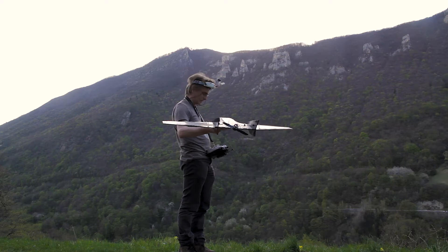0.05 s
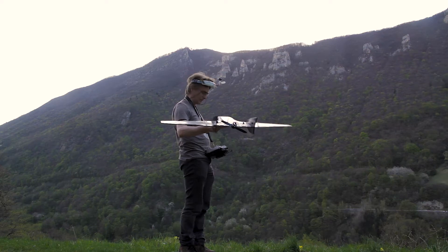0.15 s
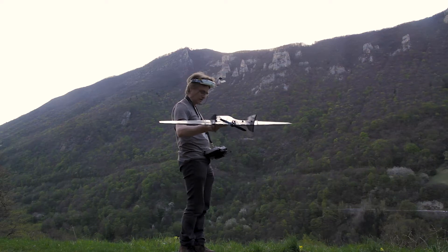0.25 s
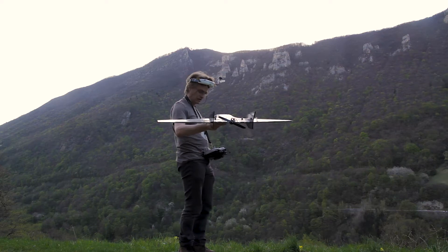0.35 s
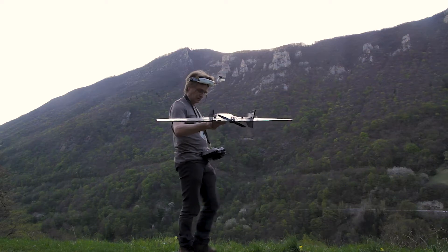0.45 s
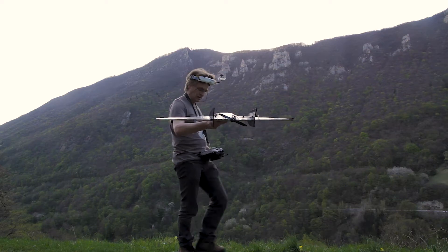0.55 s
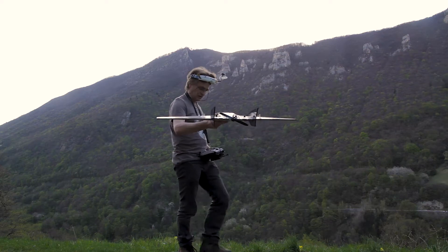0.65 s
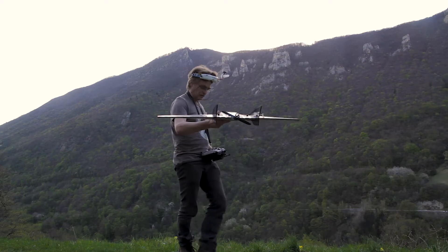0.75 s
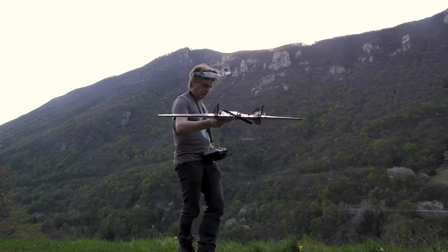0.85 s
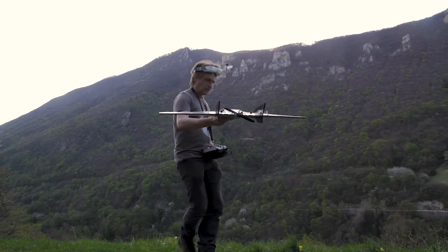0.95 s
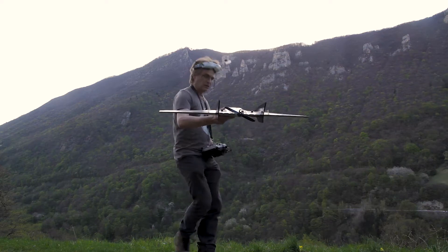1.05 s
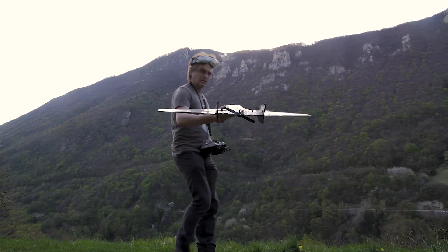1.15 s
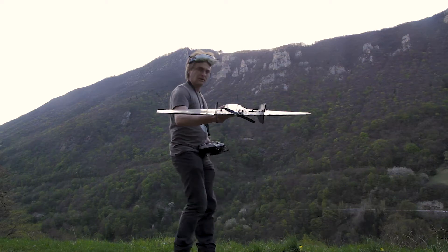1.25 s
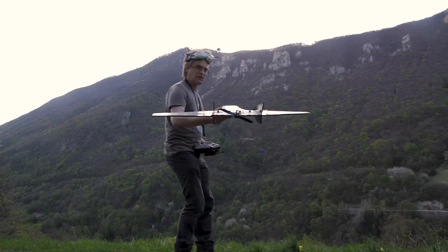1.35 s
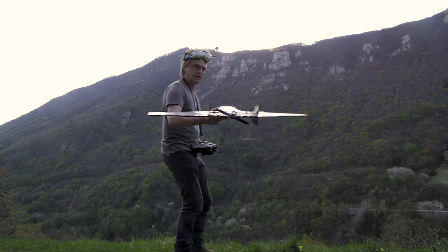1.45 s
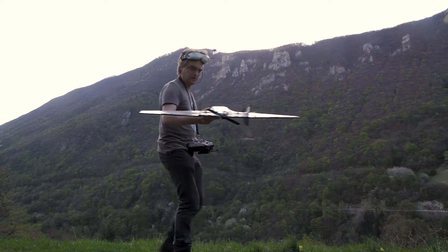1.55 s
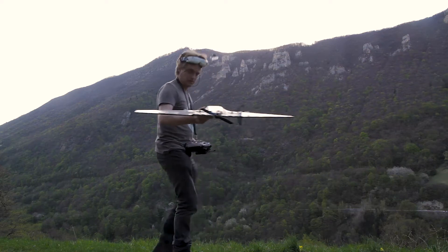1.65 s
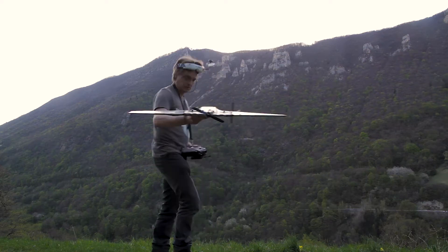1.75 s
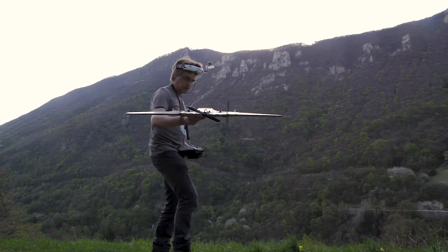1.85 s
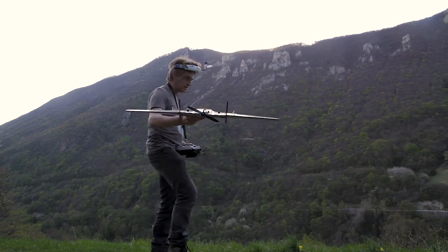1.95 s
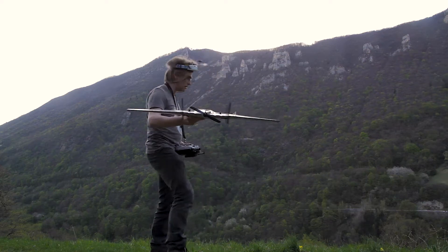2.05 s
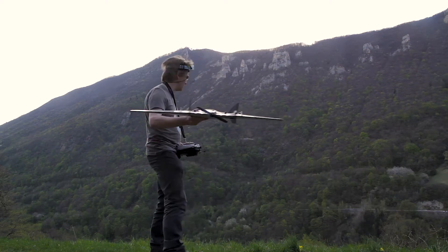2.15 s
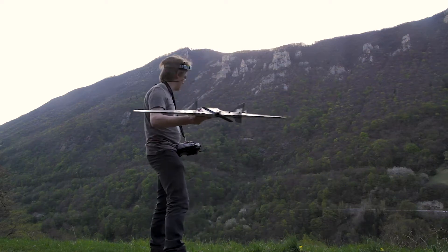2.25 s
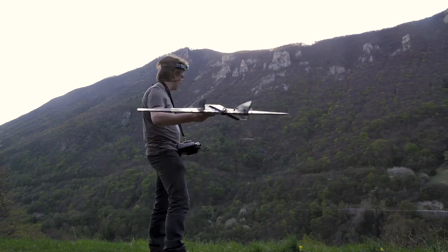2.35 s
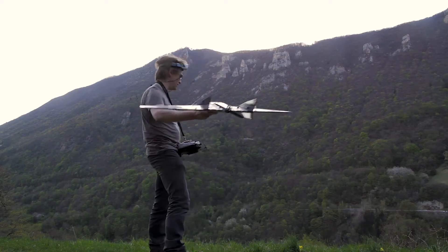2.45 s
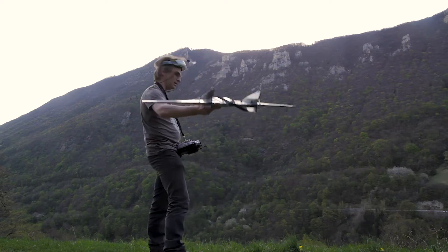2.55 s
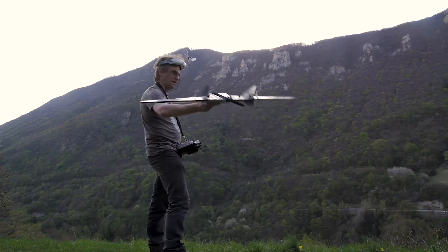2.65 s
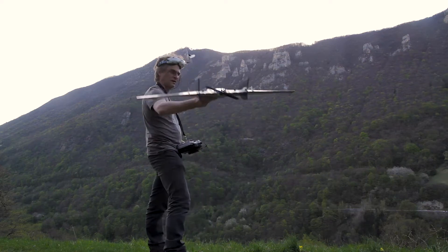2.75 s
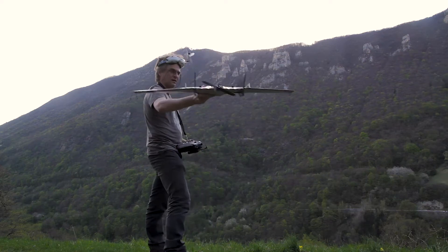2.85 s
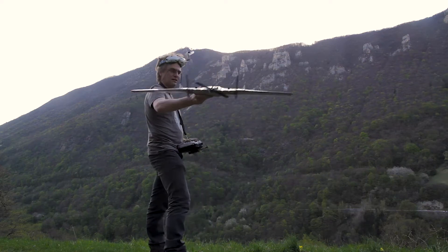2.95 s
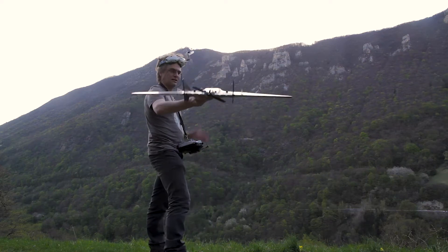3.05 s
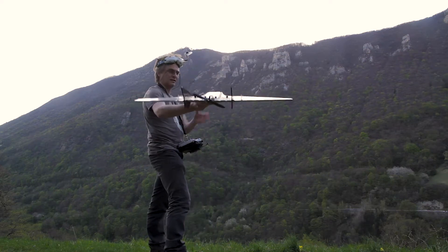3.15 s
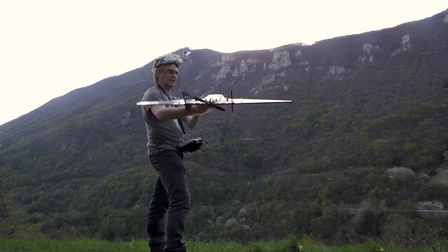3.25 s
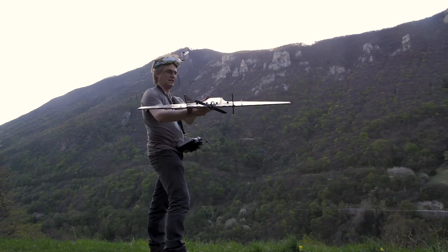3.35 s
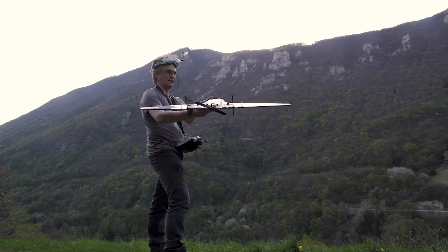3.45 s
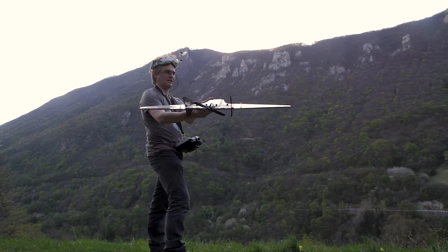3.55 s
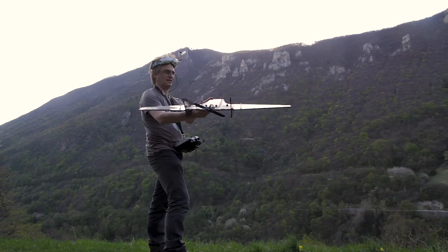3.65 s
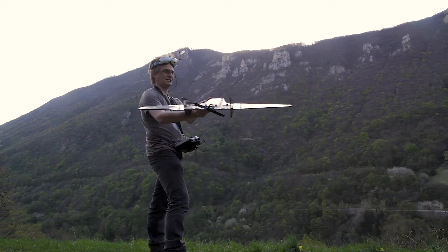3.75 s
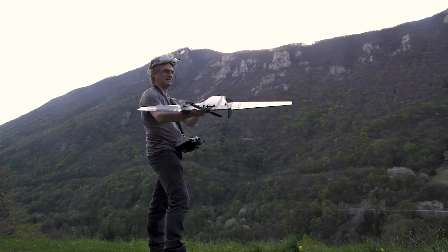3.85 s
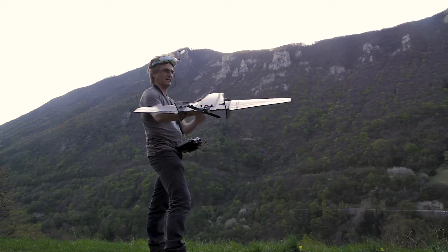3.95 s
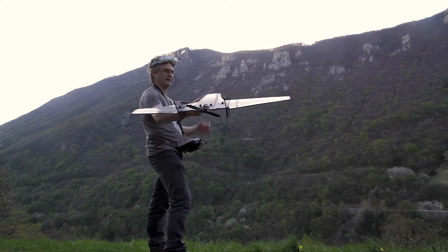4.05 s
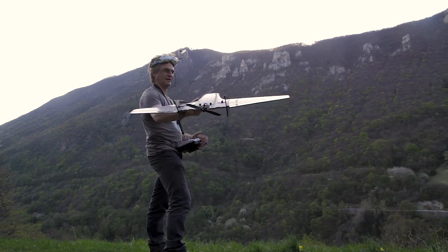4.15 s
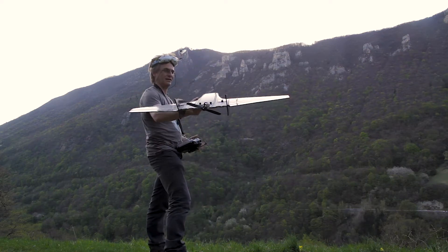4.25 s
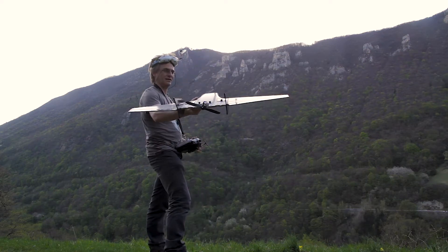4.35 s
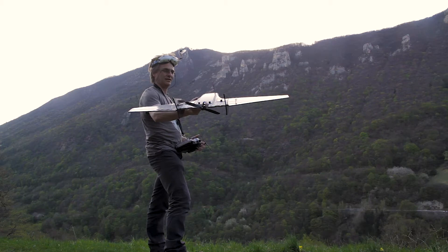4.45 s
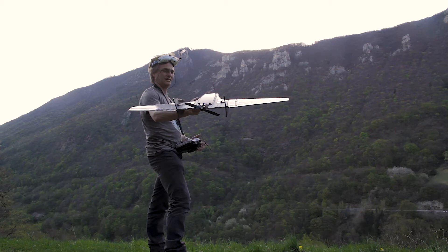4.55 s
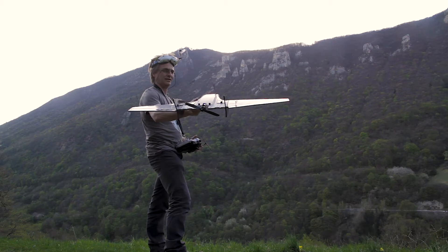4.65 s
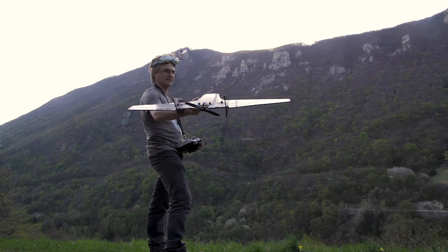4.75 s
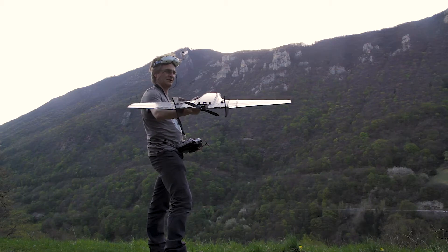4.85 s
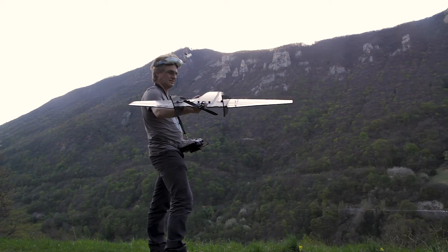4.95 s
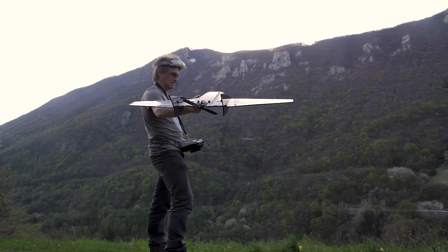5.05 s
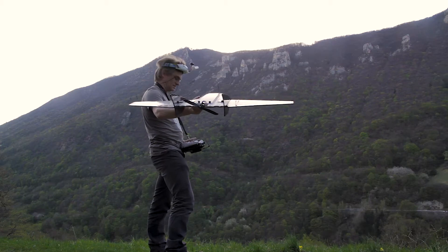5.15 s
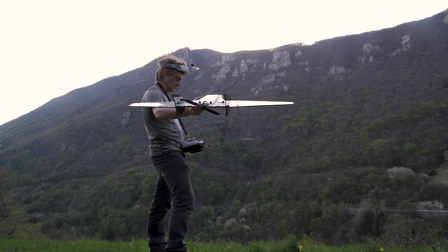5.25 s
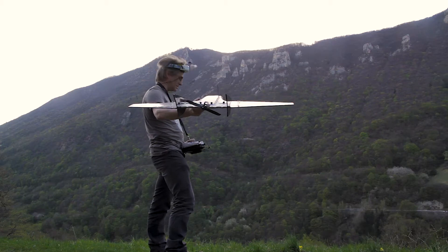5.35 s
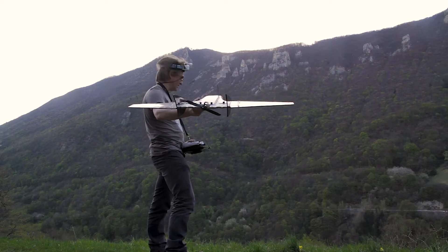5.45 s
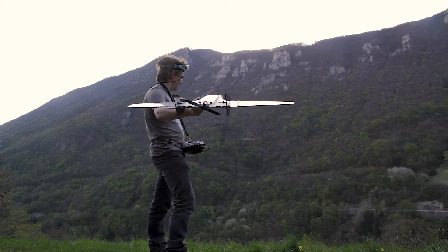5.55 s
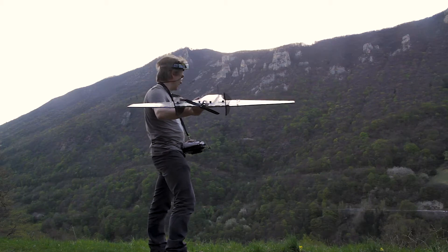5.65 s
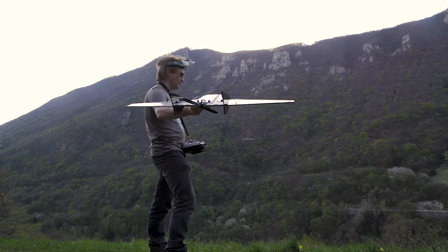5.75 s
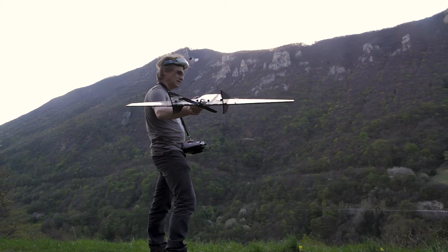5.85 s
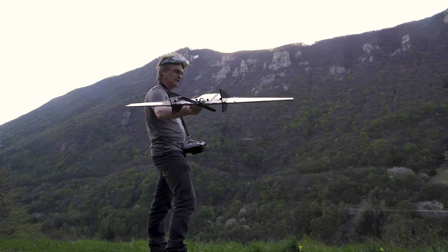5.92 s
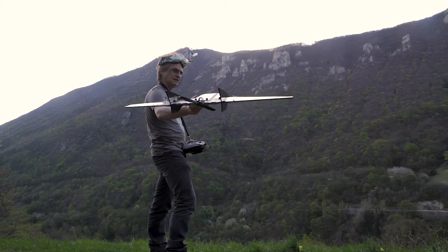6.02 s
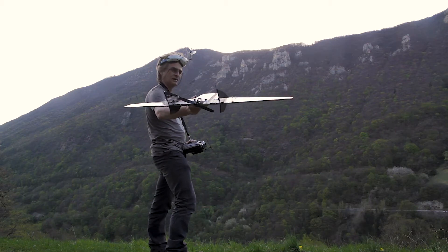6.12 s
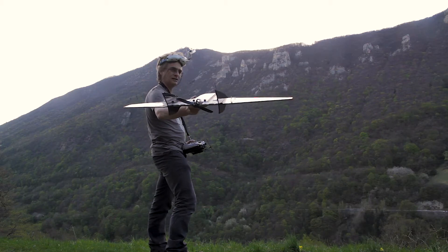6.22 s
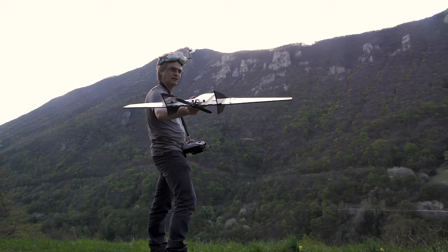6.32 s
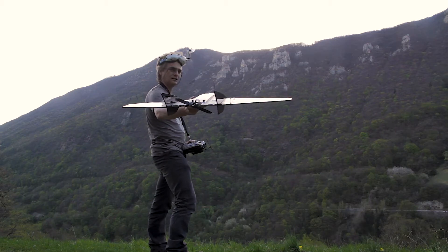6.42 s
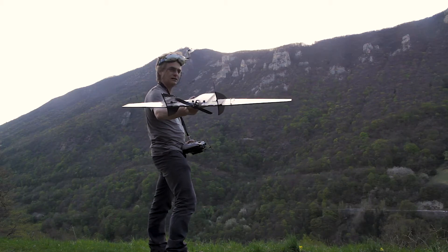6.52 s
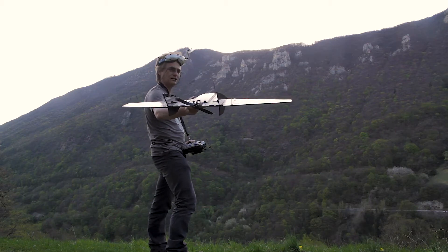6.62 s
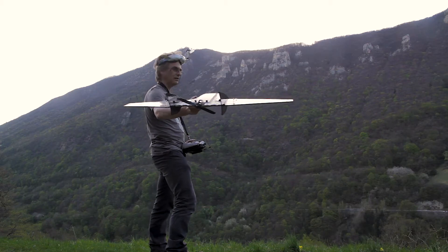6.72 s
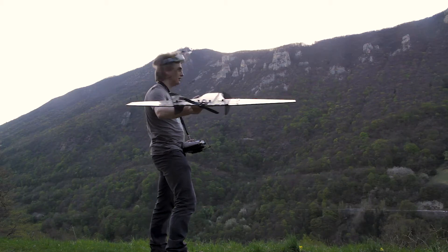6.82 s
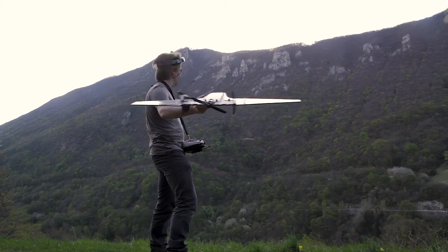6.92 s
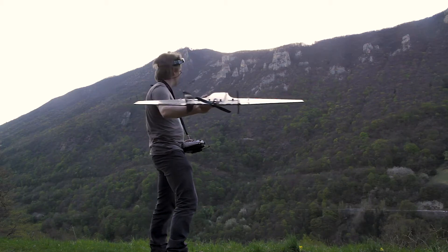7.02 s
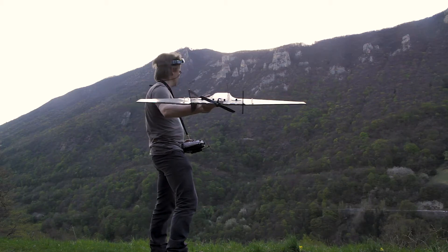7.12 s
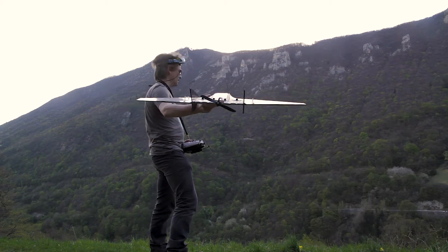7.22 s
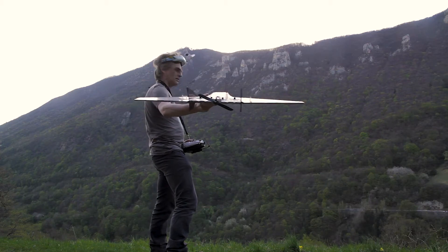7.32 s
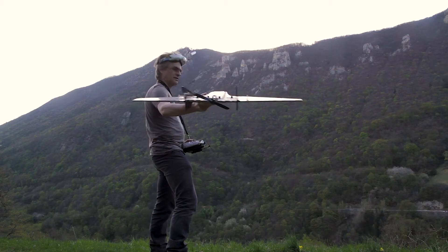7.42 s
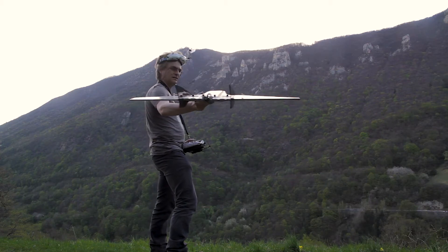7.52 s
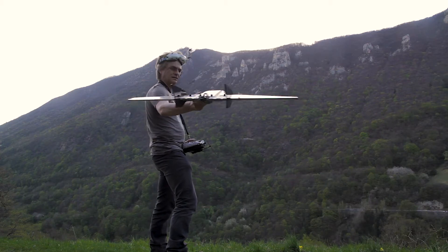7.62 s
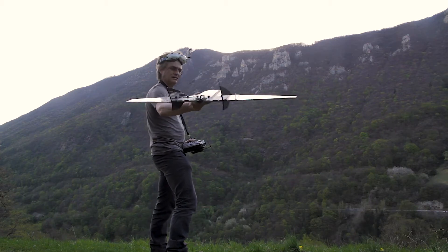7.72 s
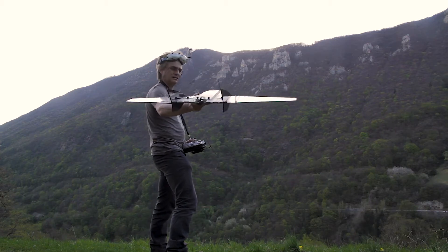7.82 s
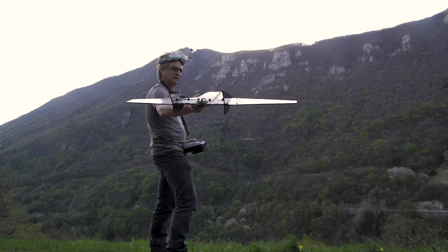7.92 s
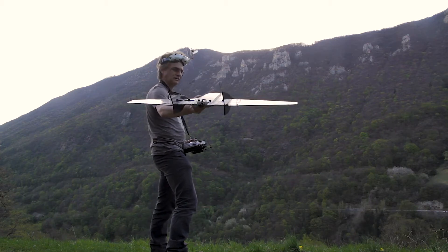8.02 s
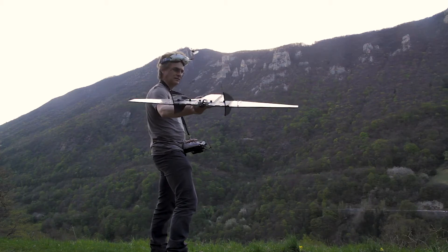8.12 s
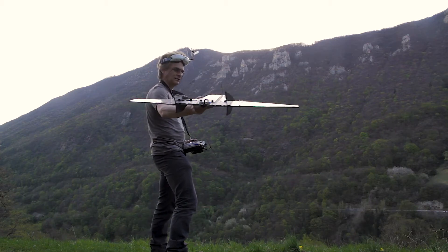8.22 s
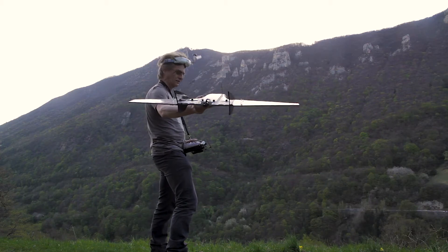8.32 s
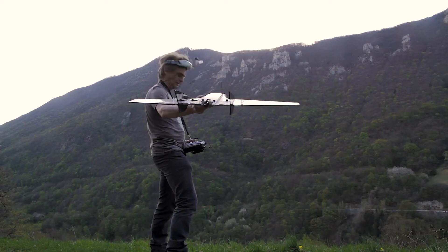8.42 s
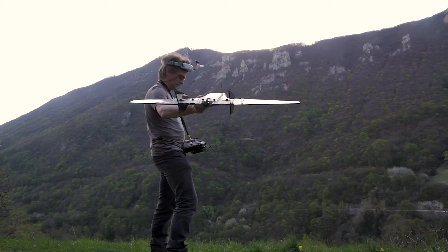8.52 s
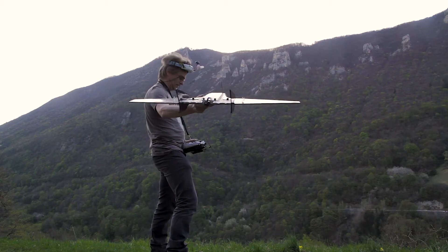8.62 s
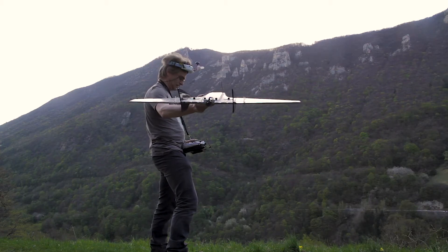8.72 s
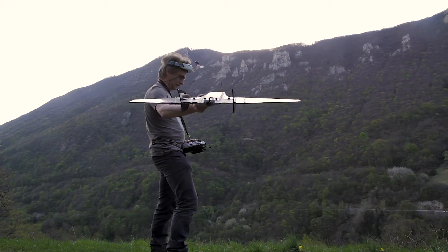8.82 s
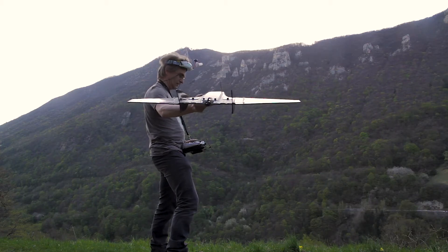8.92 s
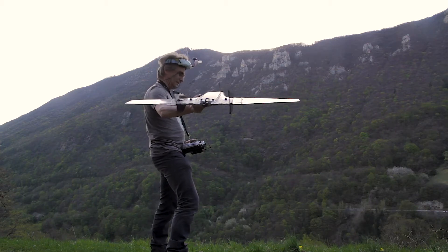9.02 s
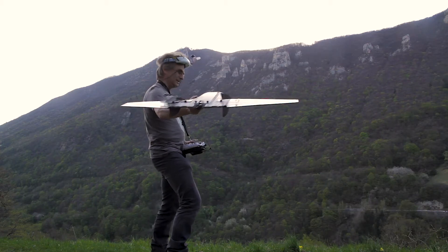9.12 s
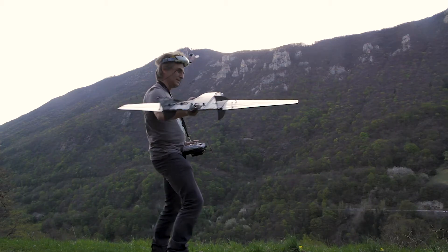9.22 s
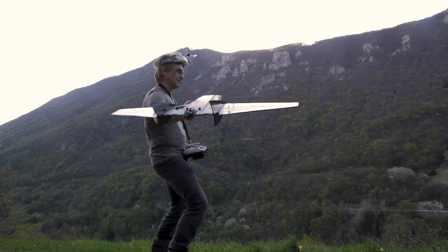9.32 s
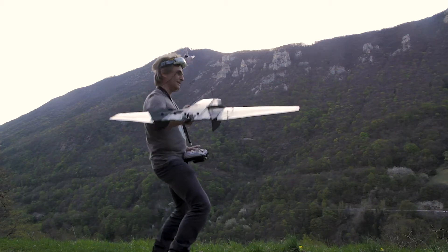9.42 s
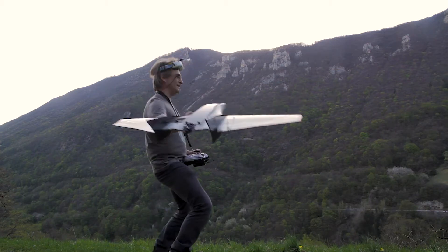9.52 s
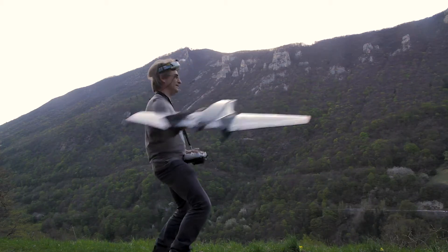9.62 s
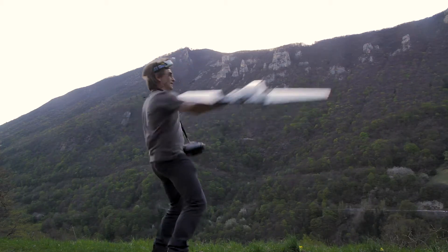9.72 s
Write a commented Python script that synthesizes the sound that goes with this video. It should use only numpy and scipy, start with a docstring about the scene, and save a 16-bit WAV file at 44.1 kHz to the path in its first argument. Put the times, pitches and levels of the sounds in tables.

```python
"""A grassy slope above a quiet valley: far rumble and wash, near and far birds, feet shuffling and
snapping dry stalks close by. A far engine's drone joins in midway, and one bird repeats its song.
Then a hand-held model plane is switched on: its electric motor jolts at each commutation step, ticks
and whines up, and a two-blade propeller sings at multiples of its blade rate over throbbing air rush.
At full speed it is loud enough to flatten the peaks in a mono camera microphone."""
import sys
import numpy as np
from scipy import signal
from scipy.fft import rfft, irfft, next_fast_len
from scipy.io import wavfile
from scipy.ndimage import uniform_filter1d

SR = 44100
rng = np.random.default_rng(int(sys.argv[2]) if len(sys.argv) > 2 else 0)


def attenuation_scalar(level_db):
    """Turn a level in dB into a linear amplitude multiplier (20 dB per decade)."""
    decades = np.asarray(level_db, float) / 20
    return 10 ** decades


def store_pcm(level_fs):
    """Save levels as 16-bit WAV."""
    pcm = np.round(np.clip(level_fs, -1, 1) * 32767).astype(np.int16)
    wavfile.write(sys.argv[1], SR, np.atleast_2d(pcm).T)


N = 430857
T = np.arange(N) / SR


def level(x, db):
    """Scale to an rms level."""
    return x * attenuation_scalar(db) / np.sqrt(np.mean(x ** 2))


def columns(table, t=T):
    """Curves of a table over time, joined by straight lines."""
    s, *cols = np.transpose(table)
    return [np.interp(t, s, c) for c in cols]


def colour(x, points):
    """Shape by a (Hz, dB) spectrum, straight over log frequency."""
    hz, db = np.transpose(points)
    size = next_fast_len(len(x))
    f = np.arange(1, size // 2 + 2) * SR / size
    gain = attenuation_scalar(np.interp(np.log(f), np.log(hz), db))
    return irfft(rfft(x, size) * gain, size)[:len(x)]


def walk(rate, count=N):
    """Random levels held 1 / rate s and slewed twice; spread near 1."""
    hold = int(SR / rate)
    steps = np.repeat(rng.standard_normal(count // hold + 1), hold)
    return 1.56 * uniform_filter1d(uniform_filter1d(steps, hold), hold)[:count]


def band(x, hz, width_hz):
    """One resonance, gain 1 at the centre."""
    return signal.lfilter(*signal.iirpeak(hz, hz / width_hz, fs=SR), x)


# spectrum of the far wash: freq_hz, level_db (per Hz, relative)
WASH_COLOUR = [(20, -8), (70, -0.5), (250, -4), (500, -12), (1000, -16), (2000, -18.5), (3200, -28),
               (4200, -37), (4800, -45), (6300, -52), (16000, -59)]
WASH_DB = -42.5
# far engine and air: start_s, rumble_db
RUMBLE_LEVEL = [(0.0, -66), (1.52, -42.5), (3.26, -51.5), (4.87, -37), (7.5, -38)]
# spectrum of that rumble: freq_hz, level_db (per Hz, relative)
RUMBLE_COLOUR = [(15, -16), (30, 4.5), (70, 7), (120, 2), (170, -8), (400, -62)]
# far engine's drone, around which it wanders: start_s, pitch_hz, peak_db
DRONE = [(4.4, 100.1, -69), (4.9, 112, -40.5), (5.3, 122, -36), (5.9, 112, -43), (6.5, 118, -40),
         (7.1, 117.7, -46.5), (7.8, 121.3, -38), (8.2, 120, -61)]
# rustle of leaves: start_s, level_db
LEAVES = [(0, -77), (1.3, -72.5), (2.3, -73), (2.8, -94), (7.5, -98)]


def valley():
    """Far air and engine: shaped noises that billow, and a sine drone that drifts in pitch and level."""
    wash = level(colour(rng.standard_normal(N), WASH_COLOUR), WASH_DB) * attenuation_scalar(.5 * walk(4.32))
    # birds too far to tell apart: a narrow band of noise that swells
    blur = band(band(rng.standard_normal(N), 3640, 500), 3640, 500)
    chorus = attenuation_scalar(4.7 * walk(5.4) + 1.65 * walk(25)) * level(blur, -71.0)
    rustle = level(colour(rng.standard_normal(N), [(2000, -9), (6000, 3), (16000, -2)]), 0)
    leaves = attenuation_scalar(*columns(LEAVES)) * rustle
    rumble_db = columns(RUMBLE_LEVEL)[0] + 2 * walk(17)
    rumble = attenuation_scalar(rumble_db) * level(colour(rng.standard_normal(N), RUMBLE_COLOUR), 0)
    hz, drone_db = columns(DRONE)
    drone_turns = np.cumsum(hz + 3 * walk(6.2)) / SR
    drone = attenuation_scalar(drone_db + 2 * walk(4.8)) * np.sin(2 * np.pi * drone_turns)
    return wash + chorus + leaves + rumble + drone


def sing(out, start, stroke, db, edge=.003):
    """Add a near sine along (s, Hz, dB) points, faded over edge seconds at both ends."""
    t = np.arange(stroke[0][0], stroke[-1][0], 1 / SR)
    hz, shape_db = columns(stroke, t)
    fade = np.clip(np.minimum(t - t[0], t[-1] - t) / edge, 0, 1)
    voice = np.sin(2 * np.pi * np.cumsum(hz) / SR)
    i = int((start + t[0]) * SR)
    out[i:i + len(t)] += 2 ** .5 * attenuation_scalar(db + shape_db) * fade * voice


# the warble leaps up, wavers round a centre and drops away
WARBLE_HZ, LEAP_FROM_HZ, DROP_TO_HZ = 5870, 4600, 4750
LEAP_S, WAVER_S, DROP_S = .012, 0.0533, 0.015
# its two waverings: rate_hz, depth_hz
WAVERS = [(47, 240), (160, 140)]


def warble():
    """The main stroke of the song, a pitch swung by sines, as (s, Hz, dB) points."""
    t = np.arange(0, LEAP_S + WAVER_S + DROP_S, 1e-3)
    corners_s = [0, LEAP_S, LEAP_S + WAVER_S, t[-1]]
    hz = np.interp(t, corners_s, [LEAP_FROM_HZ, WARBLE_HZ, WARBLE_HZ, DROP_TO_HZ])
    swing_hz = sum(depth * np.sin(2 * np.pi * rate * (t - LEAP_S)) for rate, depth in WAVERS)
    hz += swing_hz * (t > LEAP_S)
    return np.transpose([t, hz, -6 * np.clip(1 - t / LEAP_S, 0, 1)])


# single notes that glide evenly: start_s, length_s, start_hz, end_hz, level_db
NOTES = [(.12, .08, 8300, 8500, -81), (1.5, .09, 7900, 8050, -87), (6.85, .085, 8050, 8100, -84),
         (.558, 0.07, 3730, 3680, -63), (.608, .025, 7400, 4300, -74), (0.675, 0.077, 3850, 4150, -66),
         (1.03, .075, 4200, 4170, -69), (1.36, .05, 4000, 3950, -65), (1.368, 0.073, 7450, 7550, -78),
         (1.76, .02, 5700, 5300, -63), (2.252, .049, 7950, 7600, -79), (2.56, .03, 3700, 4500, -67),
         (2.935, 0.1, 7960, 7660, -66), (3.147, .012, 4600, 5340, -63), (3.158, .016, 5230, 5020, -59),
         (3.168, 0.069, 5000, 5000, -63), (3.352, .016, 4400, 4040, -61), (3.372, 0.046, 4050, 3920, -54),
         (3.42, 0.021, 3900, 3860, -55), (3.448, .013, 3910, 3900, -58), (3.469, .02, 3900, 3890, -58),
         (3.663, .08, 2740, 2570, -62), (3.86, .05, 4000, 3700, -73), (4.026, 0.12, 4700, 4980, -73),
         (4.13, .105, 4980, 5700, -74), (4.05, 0.08, 2760, 2600, -60.5), (4.053, .09, 3780, 3840, -67),
         (4.385, .02, 5600, 5050, -75), (4.275, .02, 5900, 6550, -81), (4.297, .03, 6550, 5750, -79),
         (4.55, .02, 6500, 5700, -79), (4.585, .015, 6300, 5750, -80), (4.612, .014, 5800, 6100, -78),
         (7.16, .08, 4690, 4720, -75), (4.43, .035, 6550, 6050, -81), (4.48, .065, 6500, 5450, -80),
         (4.71, 0.078, 7100, 6950, -78), (4.89, .09, 6900, 6600, -83), (5.615, .02, 5400, 4900, -77),
         (5.64, .015, 4900, 3900, -70), (5.762, .015, 5700, 4200, -69), (5.782, .02, 5000, 4000, -68),
         (6.143, 0.045, 3680, 3400, -59), (7.054, .15, 6800, 6980, -75), (7.245, .029, 4900, 3820, -57),
         (7.315, 0.014, 4200, 3500, -58), (7.335, 0.014, 4200, 3450, -58), (7.353, .013, 4060, 3320, -57)]
# a call that arches up and sags again: top_s, rise_s, sag_s, level_db
ARCHES = [(0.538, 0.1, .035, -53), (1.485, 0.076, .095, -58.5), (2.555, .105, 0.16, -58)]
ARCH_HZ, RISE_HZ_PER_S2, SAG_HZ_PER_S2 = 2980, 63000, 45000
# a trill of strokes that dip and flick up: start_s, length_s, lowest_hz, level_db
TRILL = [(2.298, .022, 6700, -69), (2.321, .02, 6000, -72), (2.342, .017, 5500, -74),
         (2.361, .018, 5400, -72), (2.38, .017, 4900, -73), (2.4, .016, 4800, -76),
         (2.428, .022, 5250, -69), (2.45, .032, 5300, -70)]
DIP_HZ, FLICK_HZ = 500, 7300
# one bird's repeated song: warble_s, warble_db, whistle_s, whistle_db, whistle_length_s
SONG = [(5.897, -65.5, 6.047, -58, 0.068), (6.162, -61, 6.31, -54, 0.065), (6.429, -57.5, 6.578, -50, .064),
        (6.696, -53.5, 6.843, -48, 0.068), (6.966, -53, 7.113, -47.5, 0.082),
        (7.253, -56.5, 7.408, -54, 0.074)]
# short strokes at the warble's front, two points each: after_start_s, pitch_hz, level_db (to the warble)
GRACE = [
    [(-.009, 4670, -9), (.006, 6400, -3)],
    [(.012, 7300, -8), (.017, 6100, -12)],
]
# a flick ahead of the whistle: after_start_s, pitch_hz, level_db (to the whistle)
PICKUP = [(-.018, 3300, -15), (-.004, 4120, -10)]
SCOOP_HZ, SCOOP_S, WHISTLE_HZ, WHISTLE_END_HZ = 3300, .01, 3864, 3780
# one hoarse note: start_s, pitch_hz, level_db
BUZZ = [(3.155, 5300, -70), (3.18, 5600, -63), (3.22, 5800, -70), (3.27, 5660, -78)]
# a lower hoarse note: start_s, pitch_hz, level_db
CHURR = [(5.25, 3850, -67), (5.45, 3693, -68)]


def birds():
    """Near and far birds as gliding sines; the trees smear each note into a decaying noise tail."""
    far, near, hoarse = np.zeros(N), np.zeros(N), np.zeros(N)
    for s, length, start_hz, end_hz, db in NOTES:
        sing(far, s, [(0, start_hz, 0), (length, end_hz, 0)], db, edge=0.079 * length)
    for s, rise, sag, db in ARCHES:
        t = np.linspace(-rise, sag, num=24)
        hz = ARCH_HZ - np.where(t < 0, RISE_HZ_PER_S2, SAG_HZ_PER_S2) * t ** 2
        sing(far, s, np.transpose([t, hz, -60 * np.maximum(t, 0)]), db, edge=.01)
    for s, length, low, db in TRILL:
        stroke = [(0, low + DIP_HZ, -3), (.3 * length, low, 0), (length, FLICK_HZ, 0)]
        sing(far, s, stroke, db, edge=0.1 * length)
    for warble_s, warble_db, whistle_s, whistle_db, length in SONG:
        for stroke in [warble()] + list(GRACE):
            sing(near, warble_s, stroke, warble_db, edge=0.0024)
        whistle = [(0, SCOOP_HZ, -8), (SCOOP_S, WHISTLE_HZ, -1), (length, WHISTLE_END_HZ, 0)]
        for stroke in PICKUP, whistle:
            sing(near, whistle_s, stroke, whistle_db, edge=0.0021)
    sing(hoarse, 0, BUZZ, 0, edge=.01)
    sing(hoarse, 0, CHURR, 0, edge=.03)
    # an uneven voice spreads into a band
    far += hoarse * level(colour(rng.standard_normal(N), [(100, 4), (500, -3), (1000, -35)]), 0)
    # moving air makes far notes flutter
    direct = far * attenuation_scalar(3.5 * walk(90)) + near
    t = T[:SR // 2]
    decay = np.exp(-np.log(1000) * t / .5)  # 60 dB down in half a second
    trees = rng.standard_normal(len(t)) * decay * np.clip(t / 0.0067, 0, 1)
    smear = signal.fftconvolve(direct, trees / np.sqrt(np.sum(trees ** 2)))[:N]
    return direct + attenuation_scalar(-12) * smear


# shuffles in the grass: start_s, length_s, level_db (top of the swell)
SHUFFLES = [(0.097, 0.018, -65), (0.245, .04, -55), (0.751, 0.094, -43.5), (0.878, 0.077, -52.5),
            (1.181, 0.052, -42), (1.3, 0.079, -55), (1.647, 0.019, -43), (1.763, 0.037, -48),
            (2.075, 0.11, -52), (3.44, 0.056, -60), (3.55, 0.034, -56), (3.72, 0.053, -54),
            (3.81, .025, -52)]
# spectrum of the grass: freq_hz, level_db (per Hz, relative)
GRASS = [(200, 16), (1000, 9), (3000, 0.5), (8000, -8.5), (15000, -14)]
# snaps of dry stalks underfoot, levels driving a bright and a low band: start_s, crack_db, body_db
SNAPS = [(0.1032, -51, -46), (0.2464, -44, -38), (0.5766, -55, -48), (0.7632, -53, -44), (0.7761, -44, -46),
         (0.8869, -55, -40), (.935, -45, -50), (1.0021, -52, -49), (1.1792, -59, -48), (1.2006, -50, -30),
         (1.3279, -56, -45), (1.6551, -50, -41), (1.77, -67, -27), (2.1485, -46, -45), (3.5644, -52, -40),
         (3.6067, -53, -43), (3.6215, -38, -45), (4.8105, -59, -48), (4.875, -58, -52), (5.7074, -60, -50)]


def feet():
    """Shuffles are dense uneven crackle; snaps are lone short cracks of decaying noise."""
    swell = sum(attenuation_scalar(db) * np.clip(1 - (2 * (T - s) / length - 1) ** 2, 0, 1)
                for s, length, db in SHUFFLES)
    struck = rng.random(N) < 900 / SR  # about 900 grains a second
    grains = struck * attenuation_scalar(5.5 * np.minimum(rng.exponential(size=N), 2.5))
    crackle = signal.lfilter([1], [1, -np.exp(-1 / (0.00045 * SR))], grains) + 1.
    out = swell * level(colour(crackle * rng.standard_normal(N), GRASS), 0)
    t = T[:400]
    for s, crack_db, body_db in SNAPS:
        burst = rng.standard_normal(len(t)) * np.exp(-t / .001)
        crack = attenuation_scalar(crack_db) * band(burst, 7900, 9000)
        body = attenuation_scalar(body_db) * band(burst, 1600, 1900)
        i = int(s * SR)
        out[i:i + len(t)] += crack + body
    return out


# motor windings: start_s, switching_tone_db, commutation_step_db
WINDING = [(7.481, -71, -21), (7.484, -44, -15), (7.491, -71, -27), (7.494, -38, -16), (7.53, -33, -28),
           (7.6, -31.5, -22), (7.69, -33, -17.5), (7.78, -26.5, -38), (7.9, -22, -50), (8.5, -26, -50),
           (8.7, -36, -50)]
# resonances of motor and mount: pitch_hz, width_hz, gain_db
CASE = [(1420, 53, 11), (2110, 130, 8.5), (3300, 170, -0.5), (4000, 100, -1), (5030, 240, 0),
        (6500, 790, -6), (7600, 380, -11)]
SWITCH_HZ, STEPS_PER_BLADE = 7968, 21


def motor(t, hz, turns):
    """A steady switching tone, and a jolt at every commutation step: ticks at first, then a rising whine."""
    count = len(t)
    switch_db, step_db = columns(WINDING, t)
    # slow steps are hard jolts, fast ones blur into a tone
    sharp = (2800 / (STEPS_PER_BLADE * hz)) ** 2.7
    phase = 2 * np.pi * STEPS_PER_BLADE * turns
    weak_strong = 1 - 0.42 * np.cos(phase / 2)  # every other step is stronger
    jolts = np.exp(sharp * (np.cos(phase) - 1)) * weak_strong
    # the rotor catches unevenly
    jolts *= (1 + 1.15 * rng.standard_normal(count)) * attenuation_scalar(1.3 * walk(56.0, count=count))
    ring = sum(attenuation_scalar(db) * band(jolts * attenuation_scalar(step_db), f, width) for f, width, db in CASE)
    switch_level = 2 ** .5 * attenuation_scalar(switch_db + walk(55.4, count=count))
    return ring + switch_level * np.sin(2 * np.pi * SWITCH_HZ * t)


FULL_HZ = 460  # blade passes a second at full speed, where the levels below hold
# colour of the blade tones: pitch_hz, level_db
BLADE_TONES = [(200, -16.5), (340, -12.5), (460, -15.5), (620, -19), (800, -19), (1100, -20), (1500, -16.5),
               (2000, -21), (2400, -17), (2900, -23), (3300, -16.5), (3680, -15), (4200, -26.5),
               (6000, -34), (10000, -41)]
TONE_GROWTH_DB, GROWTH_PER_MULTIPLE_DB = -2.5, 1.5  # for each doubling of speed
BITE_S, BITE_RISE_S = 7.6, 0.21  # the blades begin to sing
# unbalance tones between them: blade_rate_multiple, level_db (on top of UNBALANCE_DB)
UNBALANCE = [(1.5, 2.5), (2.5, -4.5), (3.5, -3), (4.5, -24), (5.5, -36), (6.5, -21), (7.5, -2), (8.5, 0.5),
             (9.5, -22)]
UNBALANCE_DB, UNBALANCE_GROWTH_DB = -29, 13
# the shaft tone is heard as it nears a resonance of the wing
SHAFT_DB, WING_HZ, WING_WIDTH_HZ = -28, 225, 16
# spectrum of the air rush: freq_hz, level_db (per Hz, relative)
RUSH = [(60, -51), (250, -11), (800, -10), (1500, -5.5), (2500, -4.5), (3600, 2.5), (4500, -6.5),
        (8000, -8.5), (16000, -20)]
RUSH_DB, RUSH_GROWTH_DB = -13.5, 11
# depth of the burst of air at each blade pass, at full speed and added for a halving of speed
THROB, SLOW_THROB = 0.75, 0.55
# the plane moves in the hand: start_s, ground_echo_lag (units of 0.9945 ms), level_to_microphone_db
HOLD = [(7.68, 2.1, -2.5), (7.8, 1.85, -2), (7.95, 1.92, 1.5), (8.1, 1.93, 1), (8.25, 2.01, 1.5),
        (8.42, 1.93, 0.5), (8.55, 2.05, 1.5), (8.7, 1.98, 0.5), (8.82, 1.79, -1.5), (8.93, 2.09, -0.5),
        (9.17, 1.933, 1.5), (9.45, 2.15, 2), (9.57, 1.64, 0), (9.66, 1.92, -1.5), (9.76, 2.1, -1.5)]
GROUND_DB = -8  # echo against the direct sound


def propeller(t, hz, turns):
    """Blade tones with ground echo, unbalance tones between them, and air rush throbbing with each pass."""
    count = len(t)
    echo_lag, hold_db = columns(HOLD, t)
    doublings = np.log2(hz / FULL_HZ)
    # the tones are ragged while the blades still bite stalled air
    ragged = .022 * np.clip(450 / hz, 1, 3) ** 2.6

    def tone(k, db):
        """A cosine at k times the blade rate, its phase straying more at slow speed."""
        stray = .3 * rng.random() + ragged * k ** .5 * walk(40.23, count=count)
        return 2 ** .5 * attenuation_scalar(db) * np.cos(2 * np.pi * (k * turns + stray))

    def echo(k):
        """Gain where direct sound and ground echo of a tone add or cancel."""
        return np.abs(1 + attenuation_scalar(GROUND_DB) * np.exp(2j * np.pi * k * hz * echo_lag * 0.0009945))

    tone_hz, tone_db = np.transpose(BLADE_TONES)
    tones = 0
    for k in range(1, 23):
        waver_db = (0.62 + 0.19 * k) * walk(11.715, count=count)  # higher tones waver more
        colour_db = np.interp(np.log(k * hz), np.log(tone_hz), tone_db)
        growth_db = (TONE_GROWTH_DB + GROWTH_PER_MULTIPLE_DB * k) * doublings
        tones += echo(k) * tone(k, colour_db + growth_db + waver_db)
    tones *= np.clip((t - BITE_S) / BITE_RISE_S, 0, 1)
    wing = 1 / (1 + ((hz / 2 - WING_HZ) / WING_WIDTH_HZ) ** 2)
    tones += wing * tone(.5, SHAFT_DB + 1.57 * walk(10.22, count=count))
    for k, db in UNBALANCE:
        waver_db = 0.96 * walk(7.1, count=count)
        tones += tone(k, UNBALANCE_DB + UNBALANCE_GROWTH_DB * doublings + db + waver_db)
    depth = THROB + SLOW_THROB * np.clip(-doublings, 0, 1)
    # dividing by the Bessel term keeps the power even as the depth varies
    throb = np.exp(depth * np.cos(2 * np.pi * turns)) / np.sqrt(np.i0(2 * depth))
    gusts_db = .8 * walk(30, count=count)
    air = level(colour(rng.standard_normal(count) * throb, RUSH), RUSH_DB)
    rush = attenuation_scalar(RUSH_GROWTH_DB * doublings + gusts_db) * air
    return attenuation_scalar(hold_db) * (tones + rush)


# the shaft starts: start_s, blade_pass_hz
START = [(7.482, 4.3), (7.52, 9), (7.55, 45), (7.592, 140), (7.616, 178)]
# propeller speed once it is under way: start_s, blade_pass_hz
SPEED = [(7.64, 208), (7.67, 234.2), (7.7, 253.3), (7.74, 268.8), (7.8, 285), (7.85, 305.8), (7.91, 327.0),
         (8.01, 350.8), (8.11, 364), (8.18, 384.8), (8.31, 387.3), (8.39, 399.9), (8.53, 431.6),
         (8.65, 439), (8.7, 452.2), (8.89, 462.1), (9.42, 460.9), (9.64, 455.7), (9.77, 446.8)]


def plane():
    """Motor and propeller turn on one shaft, so one speed curve drives both."""
    t = T[T >= WINDING[0][0]]
    hz, = columns(list(START) + list(SPEED), t)
    turns = np.cumsum(hz) / SR  # counted in blade passes
    return np.pad(propeller(t, hz, turns) + motor(t, hz, turns), (N - len(t), 0))


def scene():
    """Everything reaches one microphone, heard alike on both channels."""
    return np.tile(valley() + birds() + feet() + plane(), (2, 1))


def low_pass(x):
    """Removes everything above the highest recorded frequency."""
    return signal.sosfilt(signal.butter(12, 15900, fs=SR, output="sos"), x)


CLIP_UP, CLIP_DOWN = 0.33, 0.3  # of full scale
TOP_HZ = 15800


def record(dry):
    """The input stage runs out of room and cuts both peaks flat; later filters tilt the flats and ring."""
    flat = np.clip(dry, -CLIP_DOWN, CLIP_UP)
    low_cut = signal.butter(1, 12, "high", fs=SR, output="sos")
    high_cut = signal.ellip(8, .2, 60, TOP_HZ, fs=SR, output="sos")
    mix = signal.sosfilt(high_cut, signal.sosfilt(low_cut, flat))
    return low_pass(mix)


dry = scene()
out = record(dry)
store_pcm(out)
```